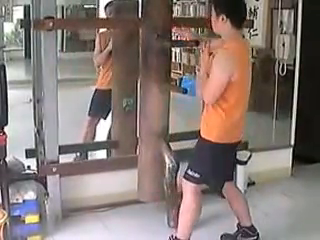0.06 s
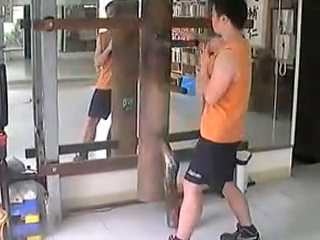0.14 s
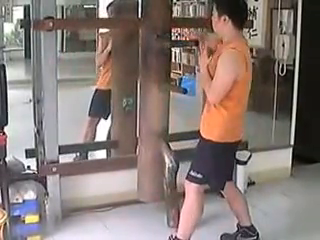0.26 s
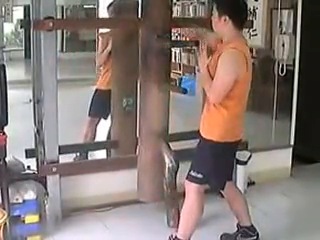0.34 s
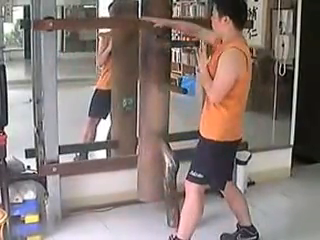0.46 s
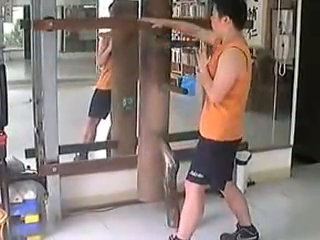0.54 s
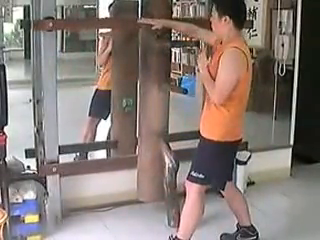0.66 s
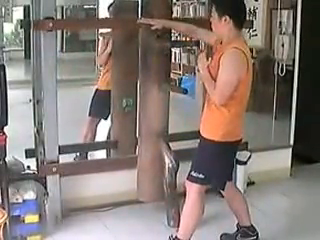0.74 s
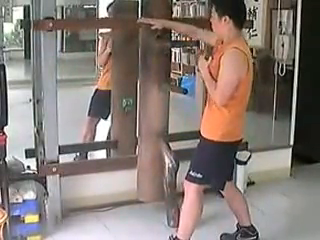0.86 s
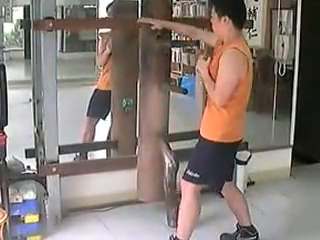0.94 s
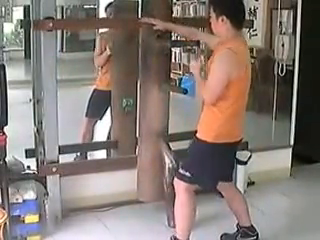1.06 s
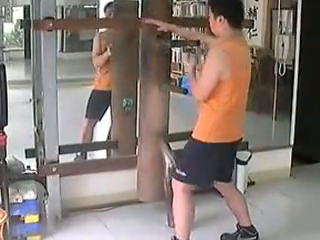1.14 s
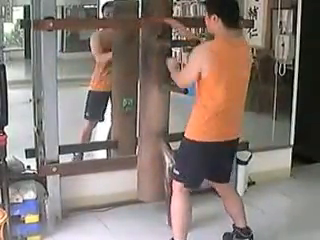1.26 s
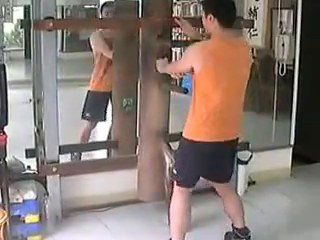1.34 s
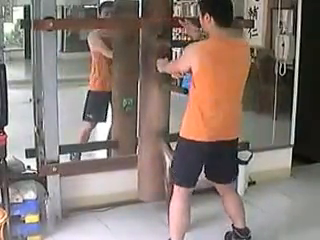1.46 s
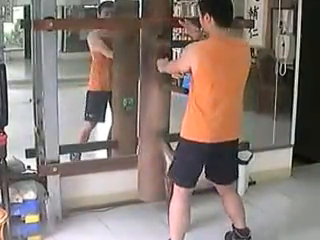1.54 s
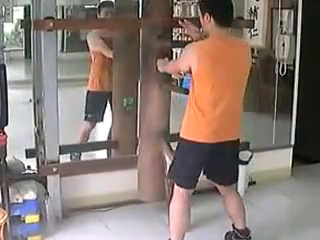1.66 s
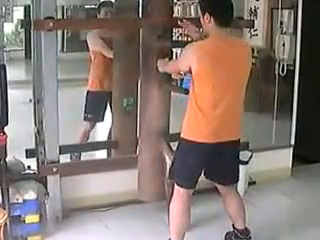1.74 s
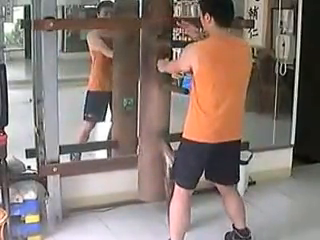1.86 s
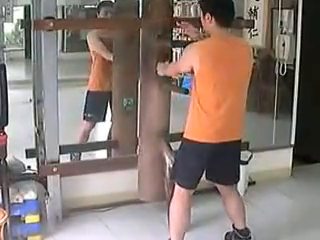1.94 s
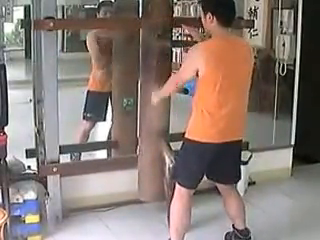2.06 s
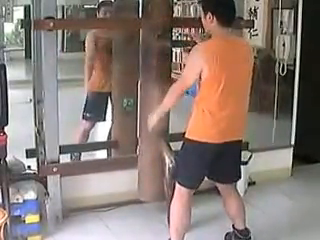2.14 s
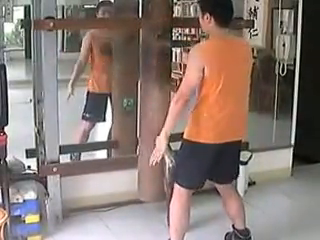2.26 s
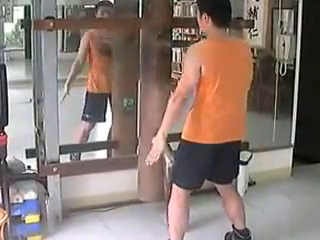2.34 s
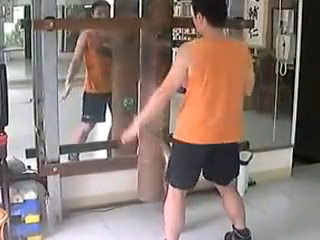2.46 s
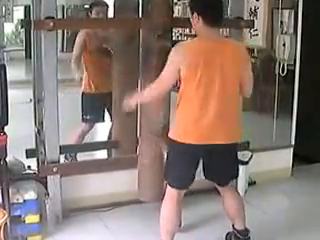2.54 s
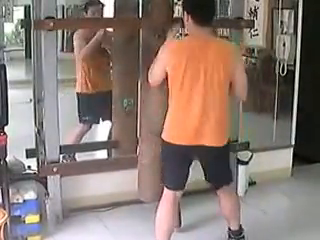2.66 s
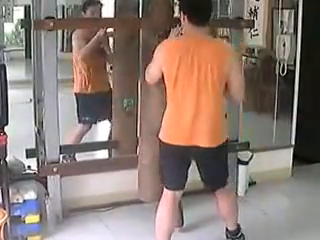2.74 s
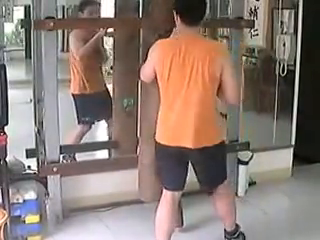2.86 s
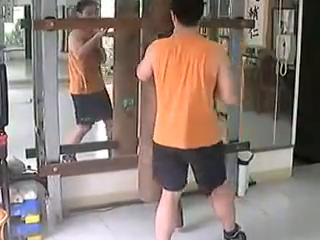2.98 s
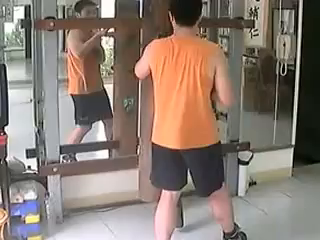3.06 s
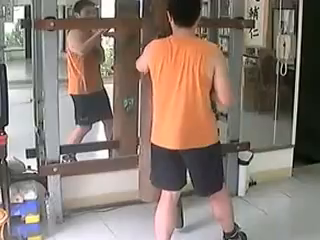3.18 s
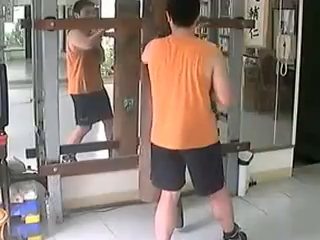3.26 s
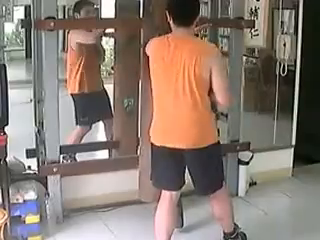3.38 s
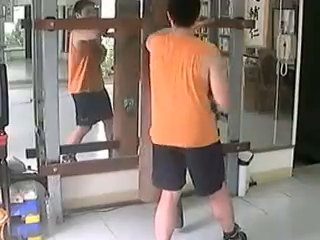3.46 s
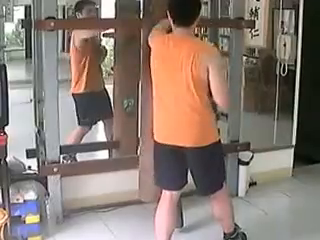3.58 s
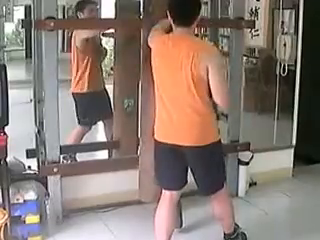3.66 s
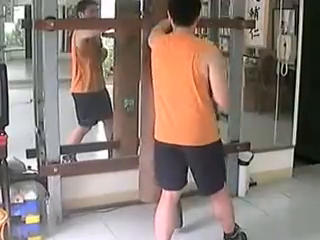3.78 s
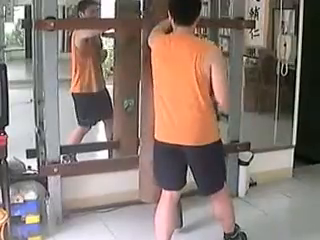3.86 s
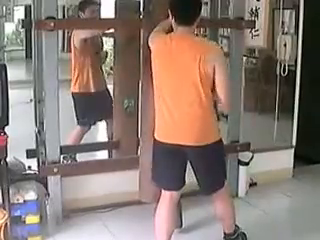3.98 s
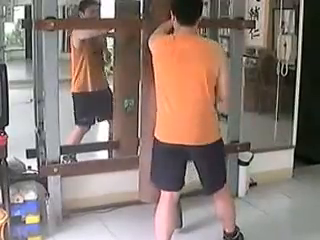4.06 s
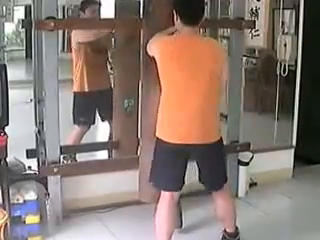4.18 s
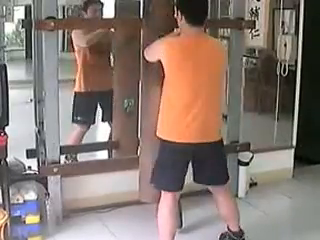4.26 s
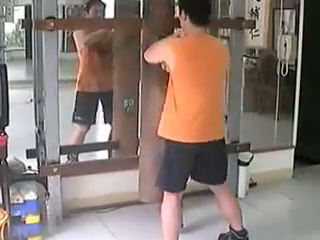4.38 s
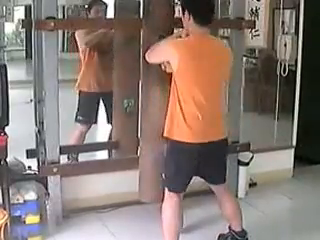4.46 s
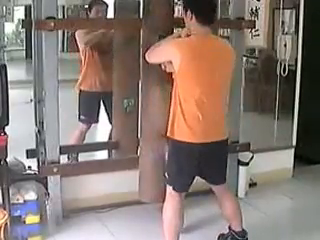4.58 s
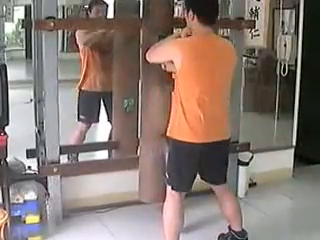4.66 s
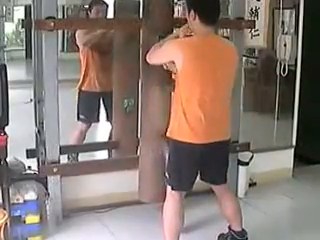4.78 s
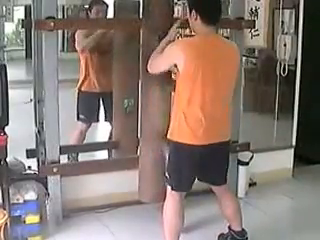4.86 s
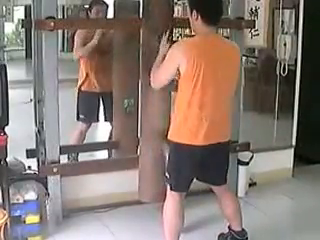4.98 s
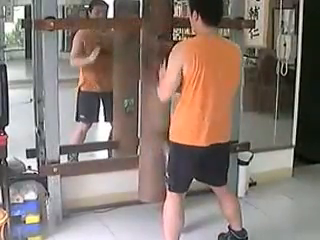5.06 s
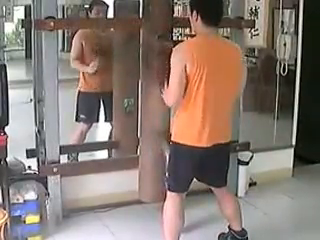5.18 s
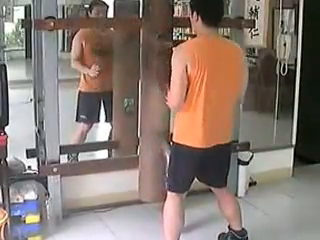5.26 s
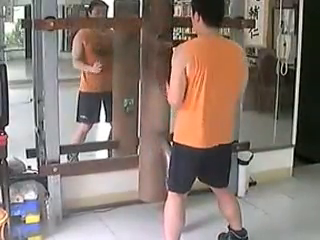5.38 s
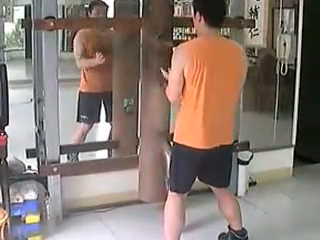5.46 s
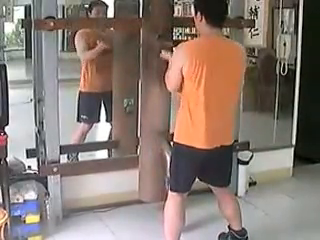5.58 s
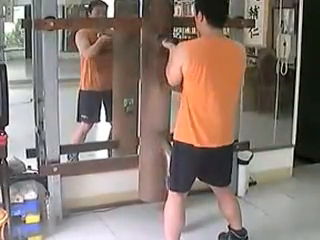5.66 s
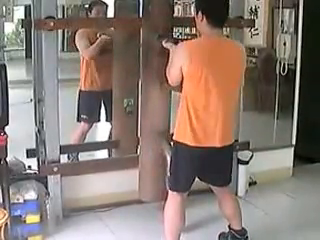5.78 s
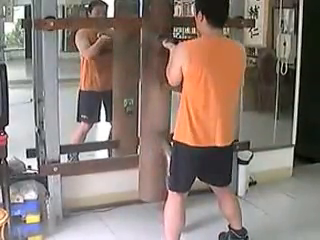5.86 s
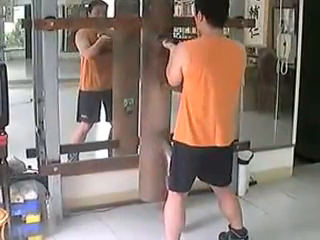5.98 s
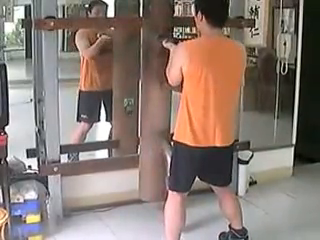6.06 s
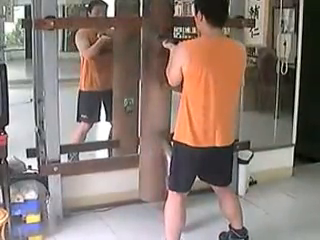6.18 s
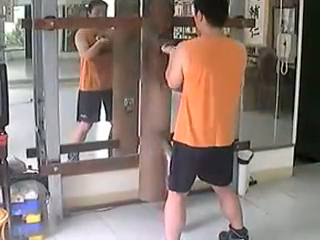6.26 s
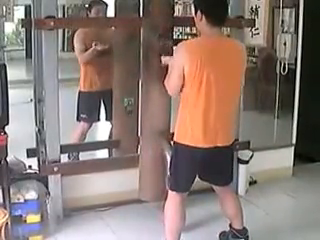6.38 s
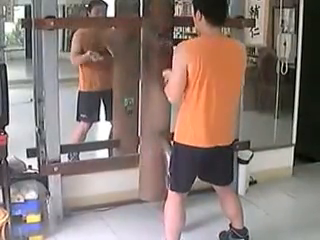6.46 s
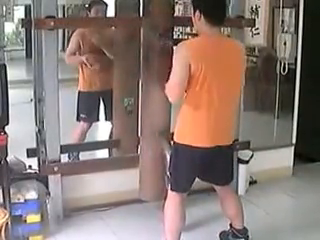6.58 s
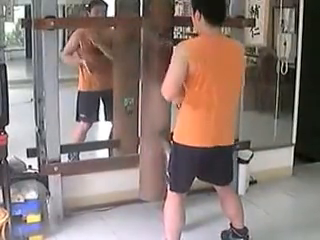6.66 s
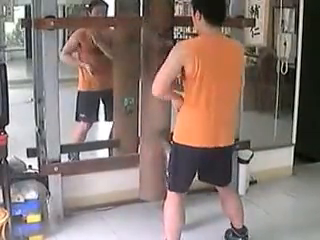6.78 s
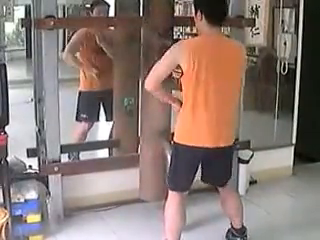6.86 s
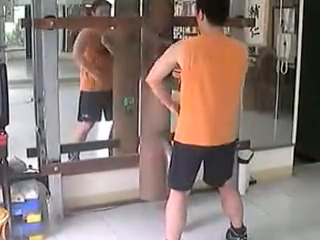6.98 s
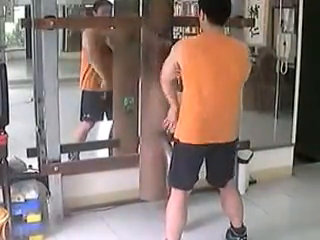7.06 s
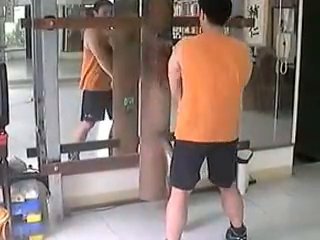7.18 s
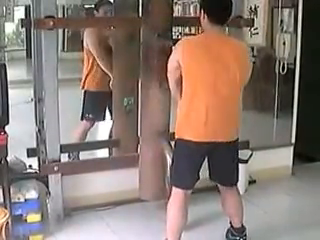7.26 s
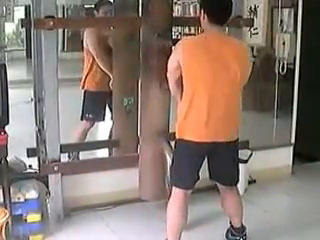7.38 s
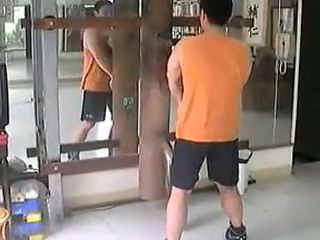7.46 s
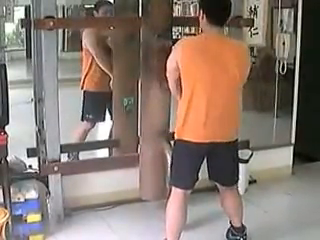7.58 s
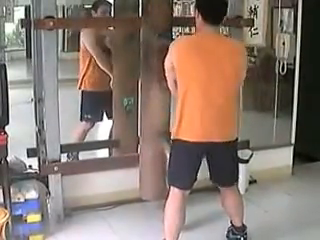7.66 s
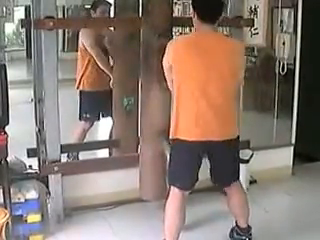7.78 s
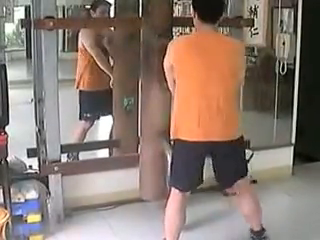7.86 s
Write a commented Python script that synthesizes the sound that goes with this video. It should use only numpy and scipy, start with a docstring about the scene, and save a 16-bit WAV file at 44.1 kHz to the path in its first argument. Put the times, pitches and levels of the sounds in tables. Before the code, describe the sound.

Ventilation hums low and hisses faintly throughout in a hard, tiled room. At 0.4 s a bare limb lands on a wooden dummy with a loud slap, knock and deep boom. A soft rubbing swells into a quick double hit at 1.3 to 1.4 s, the first more hollow, the second lighter. A barely audible pat follows at 1.7 s, then a softer brushing clack at 2.6 s. A heavy single smack with trunk thud comes at 3.5 s. Around 4.3 s a sharp knock is ringed by small slaps and sliding skin. At 5.6 to 5.7 s a dense, very loud rattle of wood and booms bursts out, with a light tap at 5.9 s and a faint pat at 6.2 s. Faint rubbing precedes a last clattering cluster at 7.1 s, its short echo fading into the hum. The small microphone sounds rough and overloaded on peaks.

```python
"""Forearms and palms strike a wooden training dummy in a hard, tiled room: skin slaps, arms knock, the trunk booms.
Slaps are decaying noise; knocks and booms are sums of dying modes; slides of limbs and cloth are dense tiny slips.
Ventilation hums and hisses as shaped noise, and the room answers with a tail of sparse echoes.
A small two-port camera microphone overloads, samples at a low rate and leaves a mirror image in the treble."""
import sys
import numpy as np
from scipy import signal
from scipy.fft import rfft, irfft, next_fast_len
from scipy.io import wavfile
from scipy.ndimage import uniform_filter1d

SR = 44100
rng = np.random.default_rng(int(sys.argv[2]) if len(sys.argv) > 2 else 0)


def makeup_ratio(level_db):
    """Linear amplitude ratio for a level in decibels (20 dB per factor of ten)."""
    decades = np.asarray(level_db, float) / 20
    return 10 ** decades


def dump(signal):
    """Clip the signal to [-1, 1] and save it as 16-bit WAV at the path in sys.argv[1]."""
    limited = np.clip(np.atleast_2d(signal).T, -1, 1)
    pcm = np.round(limited * 32767).astype(np.int16)
    wavfile.write(sys.argv[1], SR, pcm)


N = 349271  # length in samples


def evened(x):
    """Normalisation: scales a signal to rms 1."""
    return x / np.sqrt(np.mean(x ** 2) + 1e-20)


def read(points, hz):
    """Interpolation: reads a table on a log-frequency axis."""
    f, value = np.transpose(points)
    return np.interp(np.log(hz + 1), np.log(f + 1), value)


def coloured(x, points, lead=((1, 0),)):
    """Linear filtering: multiplies the spectrum by gains in dB and turns its phase by a lead in radians."""
    size = next_fast_len(x.shape[-1])
    hz = np.fft.rfftfreq(size, 1 / SR)
    response = makeup_ratio(read(points, hz)) * np.exp(1j * read(lead, hz))
    return irfft(rfft(x, size) * response, size)[..., :x.shape[-1]]


def add(mix, s, sound):
    """Superposition: adds a sound to the mix, in place, from s seconds on."""
    part = mix[..., round(s * SR):][..., :sound.shape[-1]]
    part += sound[..., :part.shape[-1]]


# Spectrum of the ventilation. Each row: frequency in Hz, relative density in dB per Hz.
AIR_SPECTRUM = [(20, -52.5), (41, -36), (52, -15.5), (110, -8.5), (170, -8.5), (235, 4), (290, -6.5),
                (350, -20.5), (520, -17), (700, -16.5), (1050, -16), (1500, -20), (2000, -21),
                (3200, -28.5), (5500, -31), (6800, -29.5), (8000, -77.5)]
# Likeness of the air noise at the two ports. Each row: frequency in Hz, share in common from 0 to 1.
AIR_LIKENESS = [(150, .4), (700, 0.18), (1500, 0.27), (3500, 0.56), (7000, 0.64)]
# Phase of the common air noise. Each row: frequency in Hz, lead of the left port in radians.
AIR_PHASE_LEAD = [(300, 0.22), (1000, 1.5), (2200, 2.6), (3300, 3.0)]


def air(level_db=-26.5, patchy_db=1.1, swell_db=.4):
    """Partly coherent noise: ventilation as random short-time spectra, faintly patchy, partly alike at both ports."""
    frames, hz = N // 256 + 5, np.fft.rfftfreq(1024, 1 / SR)
    a, b, c, d, patches = rng.standard_normal((frames, 513, 5)).T
    # patches spread over neighbouring bands and frames; the swell moves all bands together
    patches = uniform_filter1d(patches, size=10, axis=0)
    patches = evened(uniform_filter1d(patches, size=14, axis=1))
    swell = evened(uniform_filter1d(rng.standard_normal(frames), size=40))
    likeness = np.clip(read(AIR_LIKENESS, hz), 0, 1)[:, None]
    right = a + 1j * b
    common = likeness * np.exp(1j * read(AIR_PHASE_LEAD, hz))[:, None] * right
    left = common + np.sqrt(1 - likeness ** 2) * (c + 1j * d)
    gain_db = read(AIR_SPECTRUM, hz)[:, None] + patchy_db * patches + swell_db * swell
    noise = signal.istft(np.array([left, right]) * makeup_ratio(gain_db), nperseg=1024, noverlap=768)[1]
    return makeup_ratio(level_db) * evened(noise[:, :N])


# Decay of the room. Each row: frequency in Hz, time to fall by 60 dB in seconds.
ROOM_DECAY = [(150, 0.76), (300, 0.59), (1000, 0.61), (3000, 0.51), (7000, 0.65)]


def room(x):
    """Reverberation: sparse taps of random sign, one in every 20 samples, each band dying at its own speed."""
    taps = np.zeros((2, SR))
    at = np.arange(200, SR - 20, 20) + rng.integers(0, 20, (2, (SR - 201) // 20))
    np.put_along_axis(taps, at, rng.choice([-1., 1.], at.shape), 1)
    hz, t, z = signal.stft(taps, SR, nperseg=256)
    decay = makeup_ratio(-60 * t / read(ROOM_DECAY, hz)[:, None])
    tail = signal.istft(z * decay, SR, nperseg=256)[1]
    tail = tail + 0.21 * tail[::-1]  # each port shares a little of the other's tail
    tail = tail / np.linalg.norm(tail[0])
    wet = signal.fftconvolve(x[None], tail, axes=1)[:, :N]
    return coloured(wet, [(300, -4), (1000, 8), (4000, -1)])  # (Hz, dB)


# Colour of slaps and of the rasp of a slide. Each row: frequency in Hz, relative level in dB.
SKIN_COLOUR = [(500, -11), (1000, -16), (1900, -3), (2600, -4), (3800, 1.5), (5500, -5.5), (6600, -4.5),
               (7400, -18), (8000, -79.5)]
# Colour of the wood driven by a slide. Each row: frequency in Hz, relative level in dB.
WOOD_COLOUR = [(80, -19.5), (230, 7.5), (330, 3), (430, 8.5), (700, 2), (1050, 6), (1600, -49.5),
               (3000, -71)]
# Skin and cloth sliding on wood. Each row: loudest moment in seconds, swell in seconds, fade in seconds,
# level of the rasp in dB, level of the wood over the rasp in dB.
SLIDE_EVENTS = [(1.251, .42, .08, -36.5, -19), (2.499, .12, 0.075, -40, -14),
                (2.616, 0.024, 0.082, -31.5, 1), (3.19, 0.16, 0.11, -47.5, -7),
                (4.151, 0.23, .12, -40.5, -23), (4.276, 0.044, 0.079, -28, -3.5),
                (4.389, 0.057, 0.16, -40, -16), (5.604, 0.039, 0.093, -19, -1.5),
                (5.96, 0.036, .2, -40, -20), (6.679, 0.21, 0.29, -45.5, -24),
                (7.113, .035, 0.069, -28.5, 4.5)]


def slides(grains_per_s=3200.0, grain_db=3., edge_db=-20):
    """Friction: dense tiny slips of uneven size rasp brightly and drive the wood, swelling and fading in an arch."""
    size = makeup_ratio(grain_db * np.minimum(rng.exponential(1, N), 3))
    sign = rng.choice([-1., 1.], N)
    slips = size * sign * (rng.random(N) < grains_per_s / SR)
    rasp, wood = evened(coloured(slips, SKIN_COLOUR)), evened(coloured(slips, WOOD_COLOUR))
    out, t = np.zeros(N), np.arange(N) / SR
    for s, swell, fade, db, wood_db in SLIDE_EVENTS:
        away = (t - s) / np.where(t < s, swell, fade)
        arch = makeup_ratio(db + edge_db * np.minimum(away ** 2, 10))  # edge_db down one swell or fade from the peak
        out += arch * (rasp + makeup_ratio(wood_db) * wood)
    return out


def ring(modes, detune, favour_db, swell_turns=1.5):
    """Modal decay: each mode swells over its first turns, then dies; neighbours start in opposite phase and beat."""
    t = np.arange(SR // 2) / SR
    out = np.zeros(len(t))
    for k, (hz, db, t60) in enumerate(modes):
        envelope = makeup_ratio(db + favour_db[k] - 60 * t / t60) * (1 - np.exp(-t * hz / swell_turns))
        out += (-1) ** k * envelope * np.sin(2 * np.pi * hz * detune[k] * t)
    return out / abs(out).max()


# Modes of the trunk. Each row: frequency in Hz, relative level in dB, time to fall by 60 dB in seconds.
TRUNK_MODES = [(149.8, 9.5, 0.23), (198, 1.5, 0.15), (233.6, -7, 0.46), (277.7, 6.5, 0.22),
               (309.3, 3.5, 0.11), (366, -3.5, 0.073), (398, -7, 0.075)]
# Modes of an arm, before detuning. Each row: frequency in Hz, relative level in dB,
# time to fall by 60 dB in seconds.
ARM_MODES = [(645.4, 2, 0.056), (732, -5.5, 0.06), (993, -6.5, 0.037), (1136, -13.5, 0.075),
             (1292, -7, 0.071), (1963, -2.5, 0.054), (2577, 5.5, 0.028), (3740, -2.5, 0.048)]
# Skin landing on wood. Each row: start in seconds, level in dB.
SLAP_EVENTS = [(.427, -11), (1.283, -18.5), (1.368, -17.5), (1.687, -32), (2.598, -27.5), (2.610, -22),
               (3.543, -13.5), (4.156, -28), (4.274, -13), (4.312, -24), (4.381, -27), (4.425, -23.5),
               (5.598, -11), (5.628, -15), (5.648, -19.5), (5.937, -22), (6.176, -31.5), (7.099, -15),
               (7.114, -23.5), (7.130, -21.5)]
# An arm knocking in its socket. Each row: start in seconds, level in dB, favoured pitch in Hz, rise in seconds.
KNOCK_EVENTS = [(.427, -12.5, 1064, 0.00067), (1.284, -10.5, 990, .0006), (1.368, -15, 2400, .001),
                (2.614, -16, 2320, 0.0018), (2.645, -19.5, 845, 0.0034), (3.543, -13.5, 1280, .0006),
                (4.274, -7, 566, 0.0003), (4.300, -25, 630, 0.0023), (5.590, -10.5, 686, 0.0041),
                (5.628, -20.5, 795, 0.0042), (5.655, -4, 980, .006), (5.693, -24, 944, .004),
                (5.937, -23, 725, .0006), (7.102, -13.5, 730, 0.0039), (7.116, -9, 760, 0.0026),
                (7.134, -8.5, 1230, 0.0064), (7.152, -13.5, 1230, 0.002)]
# The mass of the limb shaking the trunk. Each row: start in seconds, level in dB, favoured pitch in Hz.
BOOM_EVENTS = [(0.431, 0.5, 295), (1.286, -9.5, 292), (1.37, -19.5, 246), (2.642, -16.5, 290),
               (3.546, -1, 294), (4.277, -8, 269), (4.303, -15.5, 205), (5.631, -10, 241), (5.664, -3, 245),
               (5.702, -6, 230), (7.104, -3, 261), (7.117, -13.5, 187), (7.133, -5.5, 222),
               (7.201, -16, 219)]


def blows(slap_s=0.057, rise_s=0.003, spread=0.015, focus_db=5.0, trunk_focus_db=30.5, knock_sent_db=-6.):
    """Impact excitation: slaps of skin, knocks of the arms, booms of the trunk; as heard direct and as sent to the room."""
    near, sent, t = np.zeros(N), np.zeros(N), np.arange(4096) / SR
    # summed over all directions a slap has an even spectrum, so the room gets a coloured click
    click = coloured(signal.unit_impulse(4096, 256), SKIN_COLOUR)
    click = click / np.linalg.norm(click)
    trunk_hz, arm_hz = np.transpose(TRUNK_MODES)[0], np.transpose(ARM_MODES)[0]
    for (s, db), draw in zip(SLAP_EVENTS, rng.standard_normal((len(SLAP_EVENTS), 4096))):
        decay = makeup_ratio(db - 60 * t / slap_s)
        crack = decay * evened(coloured(draw, SKIN_COLOUR)) * np.minimum(t / rise_s, 1)
        add(near, s, crack)
        add(sent, s - 256 / SR, click * np.linalg.norm(crack))  # same energy as the slap
    # the point of contact favours some modes, by distance in octaves; no two arms are alike
    arm_draws = rng.standard_normal((len(KNOCK_EVENTS), len(ARM_MODES)))
    for (s, db, hz, rise), draw in zip(KNOCK_EVENTS, arm_draws):
        favour_db = -focus_db * np.log2(arm_hz / hz) ** 2
        clack = makeup_ratio(db) * ring(ARM_MODES, 1 + spread * draw, favour_db)
        clack = clack * np.minimum(np.arange(len(clack)) / (rise * SR + 1), 1)
        add(near, s, clack)
        add(sent, s, makeup_ratio(knock_sent_db) * clack)
    for s, db, hz in BOOM_EVENTS:
        favour_db = -trunk_focus_db * np.log2(trunk_hz / hz) ** 2
        thump = makeup_ratio(db) * ring(TRUNK_MODES, np.ones(len(TRUNK_MODES)), favour_db, swell_turns=.4)
        add(near, s, thump)
        add(sent, s, thump)
    return near, sent


# Phase of the direct sound of the dummy. Each row: frequency in Hz, lead of the left port in radians.
DUMMY_PHASE_LEAD = [(300, 0.65), (700, 1.5), (1500, 1.24), (4000, 1.84), (5200, 1.4), (7000, 1.2)]


def scene():
    """Superposition: the dummy, direct and through the room, over the ventilation."""
    near, sent = blows()
    sliding = slides()
    right = near + sliding
    left = coloured(right, ((1, 0),), DUMMY_PHASE_LEAD)
    return np.array([left, right]) + room(sent + sliding) + air()


# Weakest stored line, before loudness and wavering move it. Each row: frequency in Hz,
# level over the usual level in dB.
STORAGE_THRESHOLD = [(2500, -30), (3500, -9), (4500, -3), (5500, 1), (6300, 6), (7000, 13), (8500, 14),
                     (9500, 8.5), (10900, 7.5), (11300, 22)]


def thinned(x, masking=.45, budget_db=2.):
    """Masking: low-rate storage drops treble lines under a threshold that rises with loudness and wavers by frame."""
    hz, t, z = signal.stft(x, SR, window="cosine", nperseg=1536, noverlap=768)
    line_db = 10 * np.log10(abs(z) ** 2 + 1e-20)
    usual_db = uniform_filter1d(np.median(line_db, axis=2), size=15, axis=1).mean(0)
    frame_db = 10 * np.log10((abs(z) ** 2).sum(1).mean(0) + 1e-12)
    loudness_db = masking * (frame_db - np.median(frame_db))
    waver = evened(uniform_filter1d(rng.standard_normal(len(t)), size=3))
    threshold_db = (usual_db + read(STORAGE_THRESHOLD, hz))[:, None]
    limit_db = threshold_db + loudness_db + budget_db * waver
    return signal.istft(z * (line_db > limit_db), SR, window="cosine", nperseg=1536, noverlap=768)[1][:, :N]


def roll_off(x):
    """The treble ends steeply here."""
    return signal.sosfilt(signal.butter(12, 11910, fs=SR, output="sos"), x)


# Sensitivity of the left port. Each row: frequency in Hz, left over right in dB.
PORT_BALANCE = [(100, -8), (300, -10.5), (700, -7), (1500, -5.5), (3000, -3), (5500, 0)]
# Image above half the sampling rate. Each row: frequency in Hz, gain in dB.
MIRROR_GAIN = [(8000, 11), (9000, -3), (10600, -1.5), (10950, -4.5), (11500, -80), (12000, -90)]


def record(dry, sampling_hz=16000):
    """Aliasing: uneven ports, the mirror image that low-rate sampling leaves, thinned treble and overload."""
    ports = np.array([coloured(dry[0], PORT_BALANCE), dry[1]]) * makeup_ratio(1.5)
    # multiplying by a tone at the sampling rate folds the spectrum about half that rate
    folded = 2 * ports * np.cos(2 * np.pi * sampling_hz * np.arange(N) / SR)
    image = coloured(folded, [(7900, -100)] + list(MIRROR_GAIN))
    mix = np.clip(thinned(ports + image), -1, 1)
    return roll_off(mix)


dry = scene()
out = record(dry)
dump(out)
```